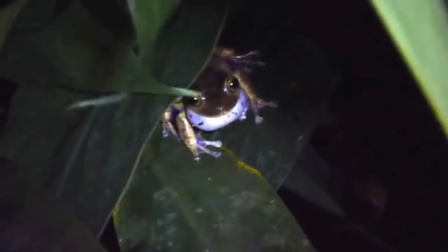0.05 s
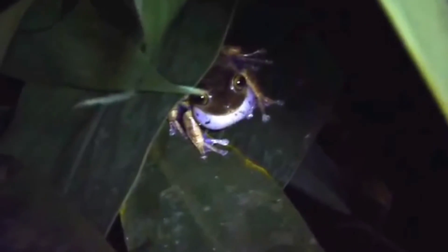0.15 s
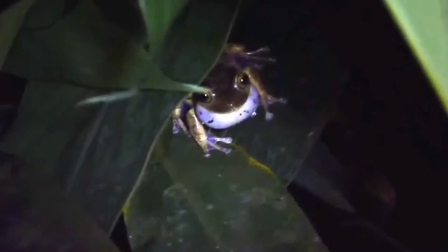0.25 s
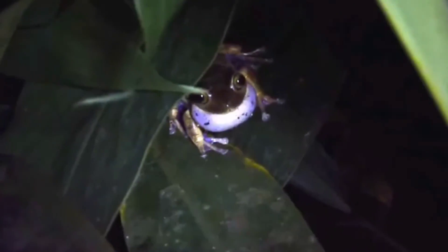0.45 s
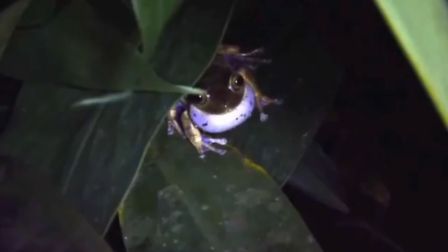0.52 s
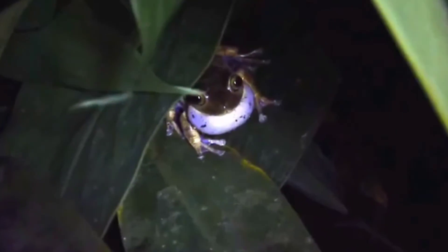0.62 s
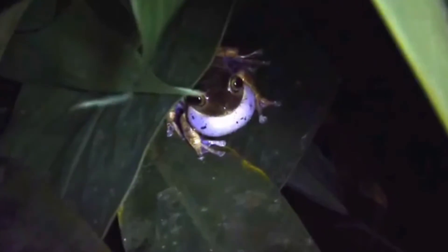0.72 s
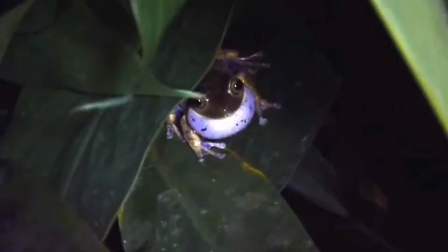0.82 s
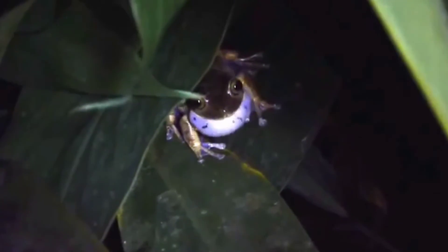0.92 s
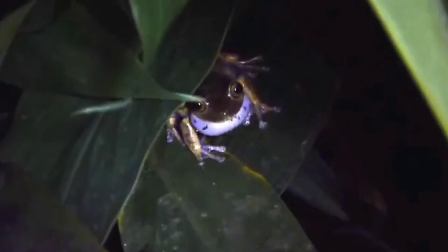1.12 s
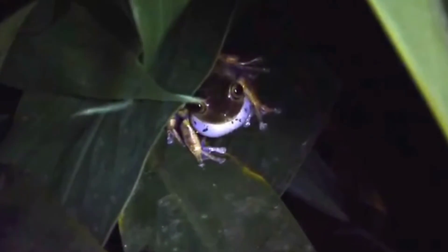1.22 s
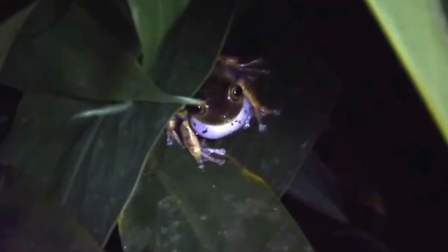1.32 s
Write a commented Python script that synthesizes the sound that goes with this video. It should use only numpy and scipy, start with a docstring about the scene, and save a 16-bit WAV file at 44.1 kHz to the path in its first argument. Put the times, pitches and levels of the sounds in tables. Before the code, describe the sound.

Close frog giving short notes and a buzzy trill, with faint crickets behind.

```python
"""A small frog in the night forest

A frog on a leaf calls close by: two short notes run into a rattling trill. Each pulse is a snap of the larynx
that excites the resonances of the vocal sac and reflects off nearby leaves and the ground. A faint low tone and
two dry ticks are heard with it. Crickets, a second frog's fine trill, far croaks and a steady hush fill the
forest behind."""
import sys
import numpy as np
from scipy import signal
from scipy.fft import rfft, irfft
from scipy.io import wavfile

SR = 44100
rng = np.random.default_rng(int(sys.argv[2]) if len(sys.argv) > 2 else 0)


def wav_record(signal):
    """Record a signal, one row per channel, as 16-bit PCM in the file named by sys.argv[1]."""
    frames = np.transpose(np.atleast_2d(signal))
    bounded = np.clip(frames, -1, 1)
    # unit amplitude maps onto the largest positive 16-bit level
    quanta = np.round(bounded * 32767).astype(np.int16)
    wavfile.write(sys.argv[1], SR, quanta)


N = 59535

# Snaps of the near frog's larynx: start_s, strength_db
PULSES = [(0.1497, -45.0), (0.15984, -42.3), (0.22657, -17.5), (0.23983, -14.1), (0.24765, -13.9),
          (0.25466, -15.7), (0.26511, -17.0), (0.34279, -9.3), (0.36068, -9.7), (0.36765, -11.0),
          (0.37354, -10.4), (0.38024, -10.9), (0.39251, -13.6), (0.42336, -18.4), (0.43924, -10.8),
          (0.46932, -8.2), (0.48118, -8.6), (0.48812, -10.4), (0.49416, -9.5), (0.50195, -11.4),
          (0.51816, -14.2), (0.53586, -11.7), (0.56189, -9.2), (0.58178, -8.2), (0.59141, -8.9),
          (0.59954, -9.2), (0.6072, -9.7), (0.61873, -12.7), (0.64103, -11.8), (0.65401, -8.8),
          (0.68404, -8.8), (0.69574, -8.7), (0.70352, -10.7), (0.71098, -10.6), (0.71888, -12.6),
          (0.73154, -13.2), (0.7543, -11.7), (0.76709, -10.4), (0.78619, -10.7), (0.8004, -11.6),
          (0.80977, -11.2), (0.81863, -12.3), (0.82863, -13.1), (0.84344, -14.0), (0.86623, -12.0),
          (0.88097, -12.6), (0.89264, -13.6), (0.9049, -15.7), (0.91843, -17.7), (0.93493, -21.2)]
# Resonances of the vocal sac: pitch_hz, width_hz, gain_db
SAC_MODES = [(1736, 127, 32.7), (2000, 487, 20.8)]
# Spectrum of the rasp after each snap: frequency_hz, gain_db
RASP_SPECTRUM = [(60, -37), (250, -29.5), (1000, -12.5), (2600, 3), (3800, -11), (5500, -15.5), (6800, -13),
                 (7600, -33.5), (14000, -26)]
# Treble of the pulses along the call: time_s, gain_db
TREBLE_CONTOUR = [(.23, 0), (.35, 1), (.65, 1), (.93, 0.5)]
# Reflections from nearby leaves and the ground: delay_ms, gain_ratio
NEARBY_REFLECTIONS = [(1.21, .71), (1.54, .3), (3.8, -.12), (7.18, .32), (8.35, .17)]
# Dry ticks in the leaves: start_s, level_db
LEAF_TICKS = [(.567, -51), (0.62, -51)]
# Chirps of the nearer crickets: centre_s, pitch_hz, level_db
CHIRPS = [(.018, 3340, -58), (.064, 3290, -59), (.115, 4490, -43.5), (.18, 4570, -50), (0.336, 4740, -45),
          (.47, 4520, -47), (0.659, 4640, -47.5), (0.822, 4620, -48), (1.03, 4680, -49.5),
          (1.09, 3343, -54), (1.18, 4460, -45.5)]
# Insect bands: pitch_hz, width_hz, level_db, throb_hz, depth_db, pan_db, coherence_ratio
INSECT_BANDS = [(4469, 170, -54.5, 4.7, 0.5, 1.5, 0.61), (4772, 310, -53, 100, 1.5, -3, 0.29),
                (4750, 1000, -60, 20, 3, -5, .4), (3274, 220, -60.5, 13, 2.5, 2, 0.2),
                (9140, 1300, -63, 17, 3, -0.5, .1)]
# Croaks of far frogs: centre_s, length_s, level_db
CROAKS = [(0.157, .018, -51), (1.052, 0.062, -57), (1.15, 0.043, -56.5), (1.24, 0.046, -49.5),
          (1.316, 0.046, -51.5)]
# Spectrum of those croaks: frequency_hz, relative_db
CROAK_SPECTRUM = [(200, -41), (500, -16.5), (700, 2), (1250, -9), (1550, -8), (1780, 1.5), (2200, -11),
                  (3000, -42), (6000, -31)]
# Spectrum of the night air: frequency_hz, relative_db
AIR_SPECTRUM = [(30, -32.5), (100, -22), (250, -14), (450, -1), (750, 1), (1300, -6.5), (1900, -4),
                (2600, -12.5), (4000, -13), (6500, -11.5), (11000, -12.5), (15000, -19)]
# Left-right likeness of the air and croaks: frequency_hz, coherence_ratio
FOREST_COHERENCE = [(60, 0.18), (150, 0.49), (370, 0.89), (940, 0.11), (2340, 1), (5840, 0.09),
                    (14600, -0.17)]

FOLIAGE_T60_S, FOREST_T60_S = 0.065, 0.5


def near_frog():
    """Interference: delayed reflections from leaves and the ground comb-filter the call, and diffuse echoes
    follow."""
    f, direct = np.fft.rfftfreq(N, 1 / SR), np.zeros(N)
    for start_s, strength_db in PULSES:
        add(direct, int(start_s * SR), amp(strength_db) * vocal_pulse(start_s))
    leaf_cutoff_hz, left_lead_s, left_db = 3150, 26e-6, 0.3
    reflections = sum(gain * np.exp(-2j * np.pi * f * ms / 1000) for ms, gain in NEARBY_REFLECTIONS)
    reflections /= 1 + (f / leaf_cutoff_hz) ** 8  # the leaves return little treble
    spectrum = rfft(direct) * (1 + reflections)
    call = irfft(spectrum, N)
    echoes = amp(-15.5) * scatter(call, FOLIAGE_T60_S) + amp(-28) * scatter(call, FOREST_T60_S)
    side = amp(left_db / 2) * np.exp(1j * np.pi * f * left_lead_s)
    return irfft(np.array([spectrum * side, spectrum / side]), N) + echoes


def vocal_pulse(start_s, size=4096):
    """Source and filter: a snap of the larynx rings the vocal sac, which opposes it in phase."""
    f, t = np.fft.rfftfreq(size, 1 / SR), np.arange(size) / SR
    tuned_s, sac_rise_per_s, overtone_fall_hz_per_s = 0.81, 0.025, 940
    tuning = 1 + sac_rise_per_s * (start_s - tuned_s)  # the sac tightens as the call goes on
    snap = amp(23) * resonance(f, hz=1285, width_hz=829) ** 2
    sac = sum(amp(db) * resonance(f, hz * tuning, width) ** 2 for hz, width, db in SAC_MODES)
    low_hz, low_width_hz, high_hz, high_width_hz = 432, 278, 4860, 5700  # edges of the radiated band
    high_pass = (f ** 2 / (low_hz ** 2 - f ** 2 + 1j * f * low_width_hz)) ** 2
    low_pass = high_hz ** 2 / (high_hz ** 2 - f ** 2 + 1j * f * high_width_hz)
    body = (snap - sac) * high_pass * low_pass
    overtone_hz = 6230 - overtone_fall_hz_per_s * (start_s - tuned_s)
    overtone = amp(-4.5) * resonance(f, overtone_hz, width_hz=310) ** 2
    rasp_decay_s = 0.009
    burst = rng.standard_normal(size) * np.exp(-t / rasp_decay_s) / np.sqrt(rasp_decay_s * SR / 2)
    rasp = amp(curve_at(RASP_SPECTRUM, f)) * rfft(burst)
    treble = amp(np.interp(start_s, *np.transpose(TREBLE_CONTOUR))) * (overtone + rasp)
    subsample_delay = np.exp(-2j * np.pi * f * (start_s * SR % 1) / SR)
    return irfft((body + treble) * subsample_delay)[:size // 2]


def low_ring(start_s=0.92, pitch_hz=710, width_hz=3):
    """Free decay: a faint tone after the call dies away at a rate set by its bandwidth."""
    age_s = np.maximum(np.arange(N) / SR - start_s, 0)
    return amp(-51) * np.exp(-np.pi * width_hz * age_s) * np.sin(2 * np.pi * pitch_hz * age_s)


def leaf_ticks(decay_s=0.0068):
    """Transients: bright noise with a sudden onset and exponential decay makes ticks in the leaves."""
    f, t = np.fft.rfftfreq(N, 1 / SR), np.arange(N) / SR
    envelope = sum(amp(db) * (t >= s) * np.exp(-abs(t - s) / decay_s) for s, db in LEAF_TICKS)
    return envelope * noise(abs(resonance(f, hz=7000, width_hz=4400)), coherence=0.81)


def cricket_chirps(length_s=0.04, waver_hz=41):
    """Frequency modulation: each nearer chirp is a soft tone whose pitch wavers at random."""
    f, t, out = np.fft.rfftfreq(N, 1 / SR), np.arange(N) / SR, np.zeros((2, N))
    for centre_s, pitch_hz, level_db in CHIRPS:
        hz = pitch_hz + waver_hz * noise(np.exp(-f / 80), coherence=1)[0]
        out += amp(level_db) * gaussian(t, centre_s, length_s) * np.sin(2 * np.pi * np.cumsum(hz) / SR)
    return out


def second_frog(start_s=1.007, rate_hz=43.3, pip_s=0.015, pitch_hz=2040, fall_hz_per_s=11000):
    """A periodic pulse train: soft, falling pips from further off form an even, reverberant trill."""
    t, trill = np.arange(-pip_s / 2, pip_s / 2, 1 / SR), np.zeros(N)
    envelope = np.cos(np.pi * t / pip_s)
    for centre_s in np.arange(start_s, N / SR + pip_s, 1 / rate_hz):
        cycles = pitch_hz * t - fall_hz_per_s * t ** 2 / 2 + rng.random()
        add(trill, round((centre_s + t[0]) * SR), envelope * np.sin(2 * np.pi * cycles))
    return amp(-48.5) * (trill + amp(-5) * scatter(trill, FOREST_T60_S))


def insect_chorus():
    """Incoherent summation: many distant insects blur into noise bands that throb unevenly."""
    f, out = np.fft.rfftfreq(N, 1 / SR), np.zeros((2, N))
    for pitch_hz, width_hz, level_db, throb_hz, depth_db, pan_db, coherence in INSECT_BANDS:
        throb = noise(np.exp(-(f / throb_hz - 1) ** 2), coherence=1)[0]
        band = noise(gaussian(f, pitch_hz, width_hz), coherence)
        balance = amp([[pan_db / 2], [-pan_db / 2]])
        out += amp(level_db) * unit_rms(band * amp(depth_db * throb)) * balance
    return out


def far_croaks():
    """Scattering: the forest smears the pulses of far frogs into short swells of noise."""
    f, t = np.fft.rfftfreq(N, 1 / SR), np.arange(N) / SR
    envelope = sum(amp(db) * gaussian(t, centre_s, length_s) for centre_s, length_s, db in CROAKS)
    return envelope * noise(amp(curve_at(CROAK_SPECTRUM, f)), curve_at(FOREST_COHERENCE, f))


def night_air():
    """Stationary noise: the forest's hush keeps a constant spectrum and level."""
    f = np.fft.rfftfreq(N, 1 / SR)
    return amp(-56.5) * noise(amp(curve_at(AIR_SPECTRUM, f)), curve_at(FOREST_COHERENCE, f))


def scatter(sound, t60_s, delay_s=0.006):
    """Diffuse reverberation: dense echoes, different on each side, fall 60 dB in t60_s."""
    t = np.arange(SR // 2) / SR
    onset = np.clip(t / delay_s - 1, 0, 1)
    tail = rng.standard_normal((2, len(t))) * amp(-60 * t / t60_s) * onset
    tail /= np.linalg.norm(tail, axis=1, keepdims=True)
    return signal.fftconvolve(sound[None], tail, axes=1)[:, :N]


def resonance(f, hz, width_hz):
    """Frequency response of a damped oscillator, with gain 1 at its centre."""
    return 1j * f * width_hz / (hz ** 2 - f ** 2 + 1j * f * width_hz)


def noise(gain, coherence):
    """Partial coherence: left and right share part of a filtered noise of rms 1."""
    left, independent = rfft(rng.standard_normal((2, N)))
    coherence = np.clip(coherence, -1, 1)
    right = coherence * left + np.sqrt(1 - coherence ** 2) * independent
    return unit_rms(irfft(np.array([left, right]) * gain, N))


def gaussian(x, centre, width):
    """Bell curve of height 1; the width spans two standard deviations."""
    return np.exp(-2 * ((x - centre) / width) ** 2)


def curve_at(points, hz):
    """Interpolation on a log-frequency axis."""
    f, value = np.transpose(points)
    return np.interp(np.log(hz + 1), np.log(f + 1), value)


def amp(db):
    """Amplitude ratio from decibels."""
    return 10 ** (np.asarray(db) / 20)


def unit_rms(x):
    """Normalisation to rms 1."""
    return x / np.sqrt(np.mean(x ** 2) + 1e-20)


def add(mix, start, sound):
    """Superposition of a sound on the mix at a sample position."""
    part = mix[max(start, 0):][:len(sound)]
    part += sound[:len(part)]


def scene():
    """Superposition: the near frog and the night chorus add as sound pressures."""
    foreground = near_frog() + low_ring() + leaf_ticks()
    return foreground + insect_chorus() + cricket_chirps() + second_frog() + far_croaks() + night_air()


def record(dry):
    """Band limiting: a steep low-pass filter removes the highest treble."""
    cutoff_hz = 15150
    low_pass = signal.firwin(511, cutoff_hz, window=("kaiser", 9), fs=SR)
    return signal.oaconvolve(dry, low_pass[None], "same")


dry = scene()
out = record(dry)
wav_record(out)
```